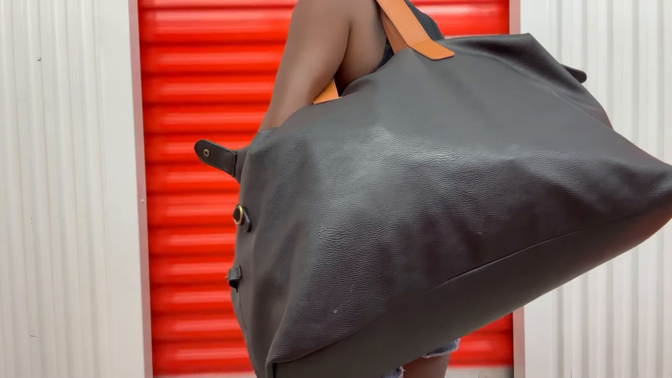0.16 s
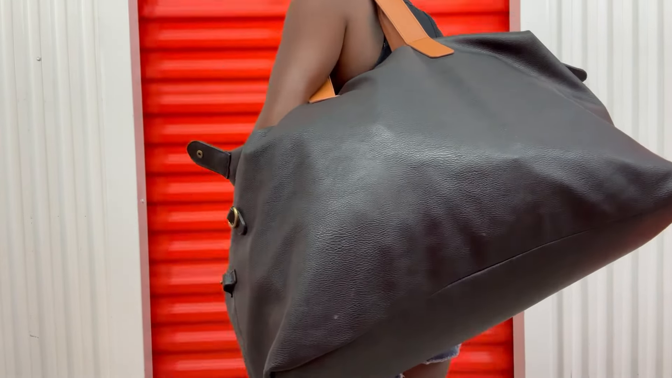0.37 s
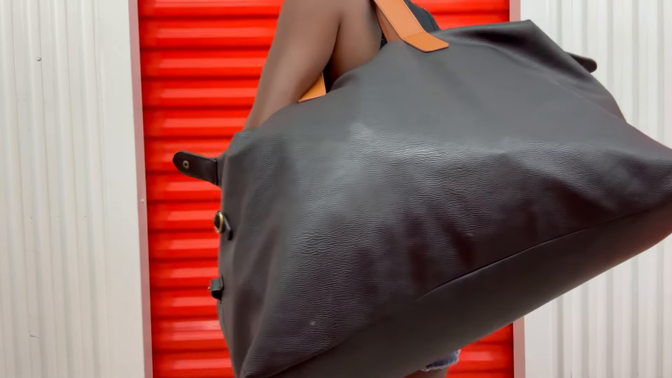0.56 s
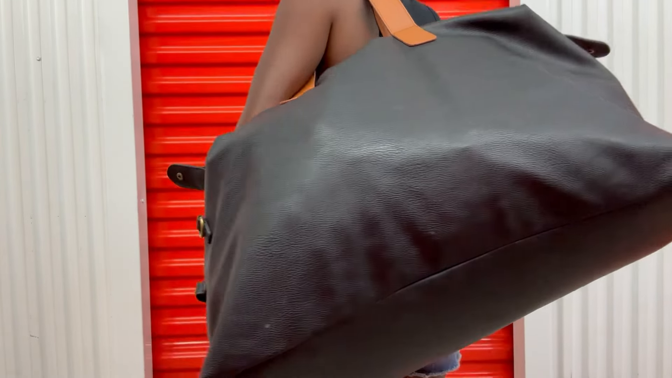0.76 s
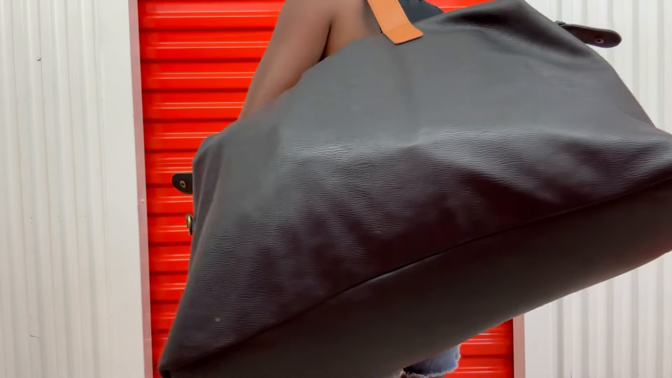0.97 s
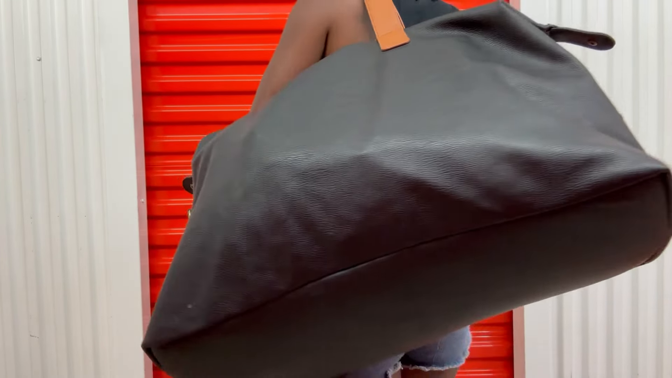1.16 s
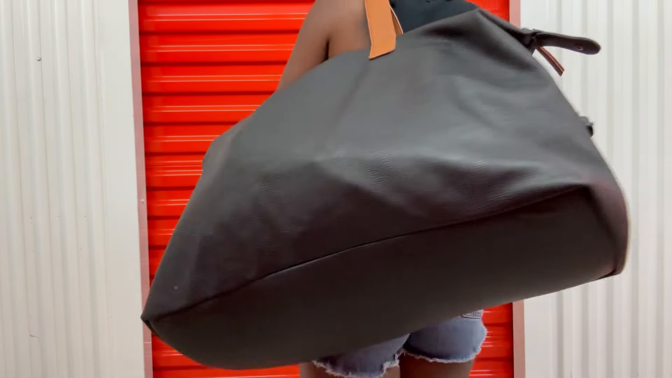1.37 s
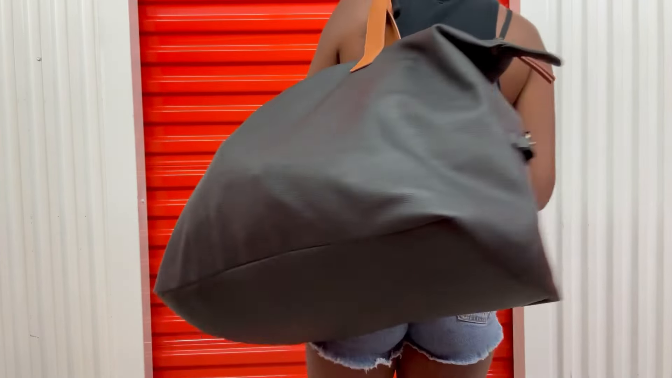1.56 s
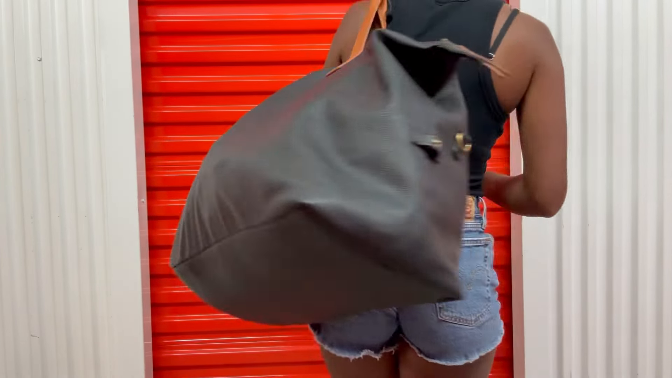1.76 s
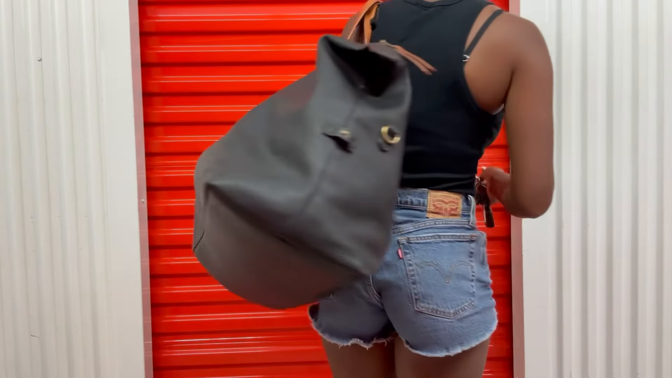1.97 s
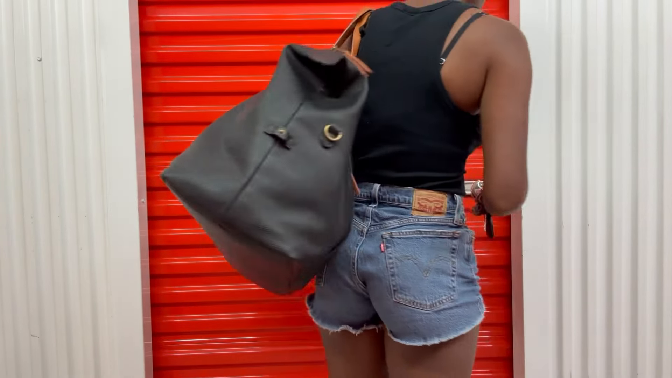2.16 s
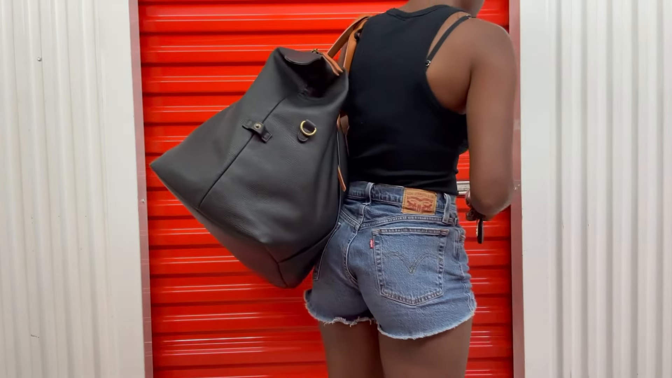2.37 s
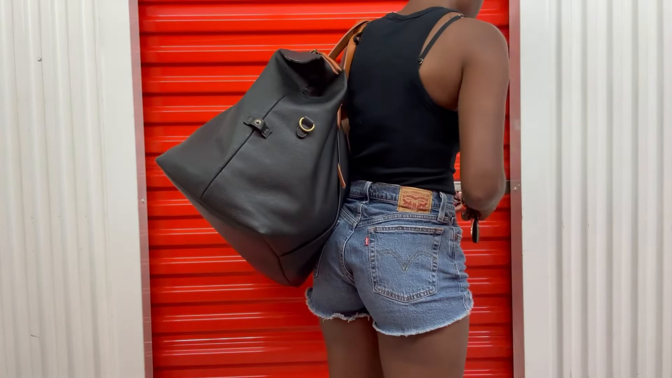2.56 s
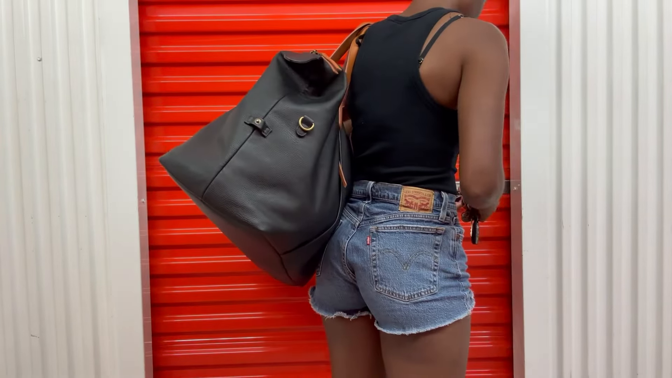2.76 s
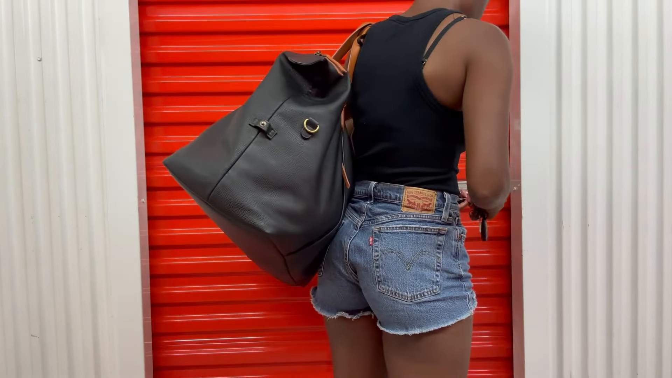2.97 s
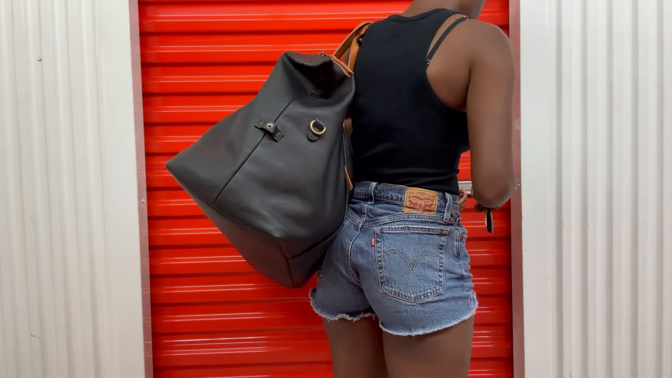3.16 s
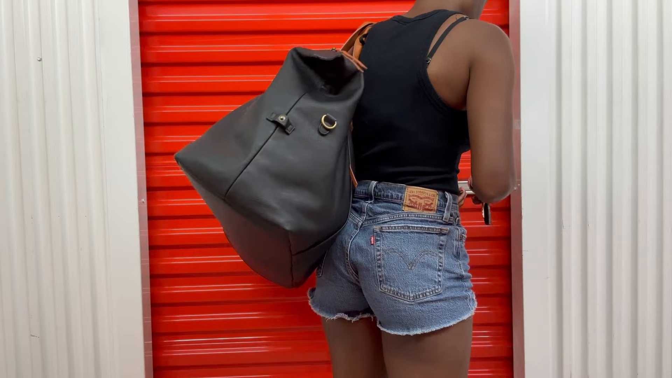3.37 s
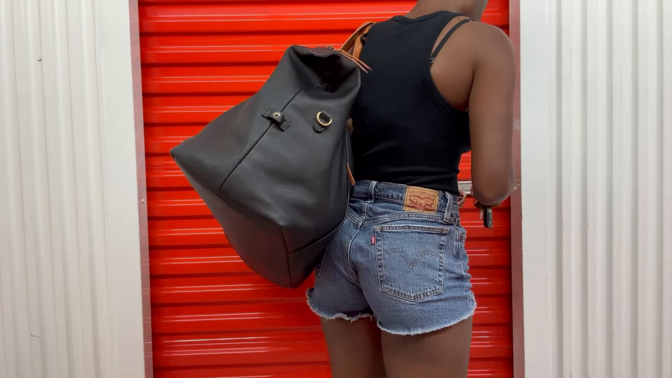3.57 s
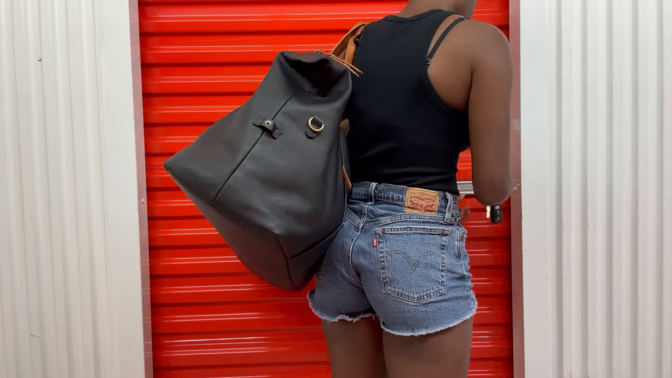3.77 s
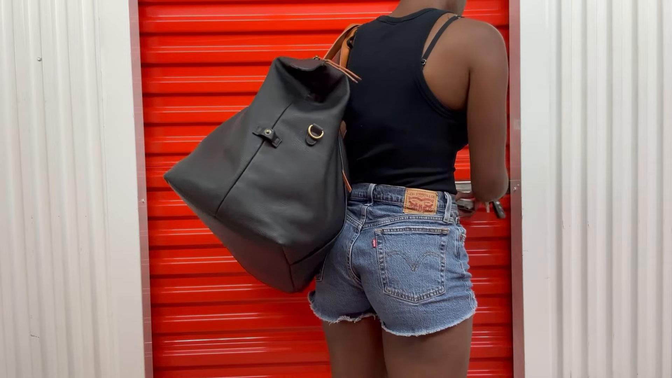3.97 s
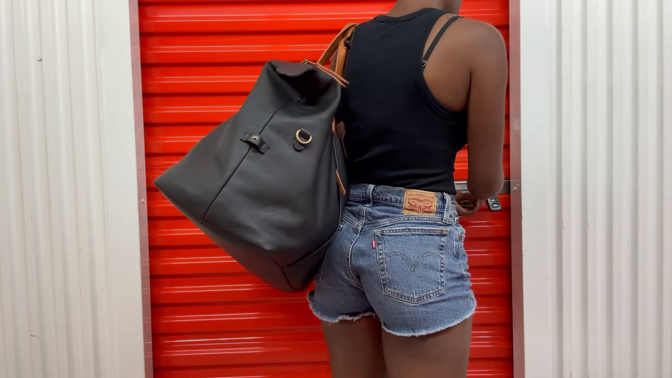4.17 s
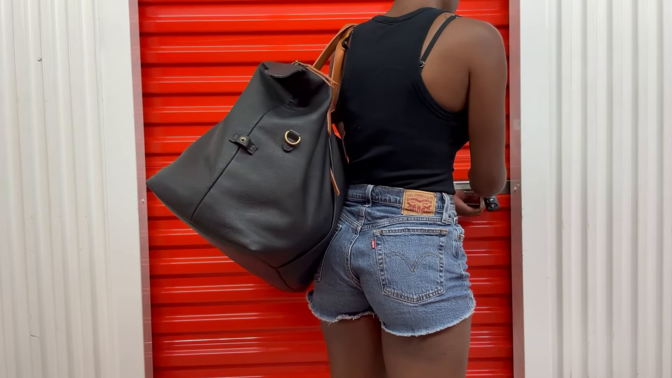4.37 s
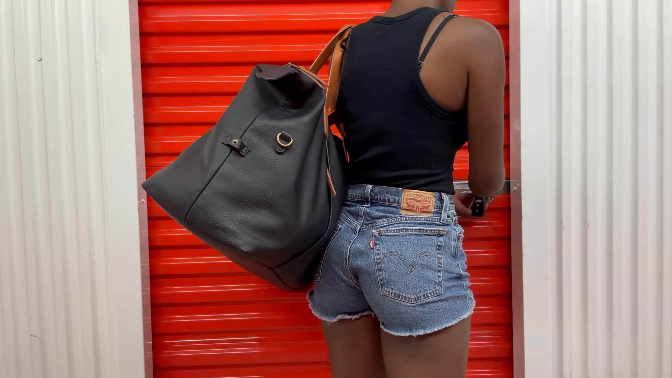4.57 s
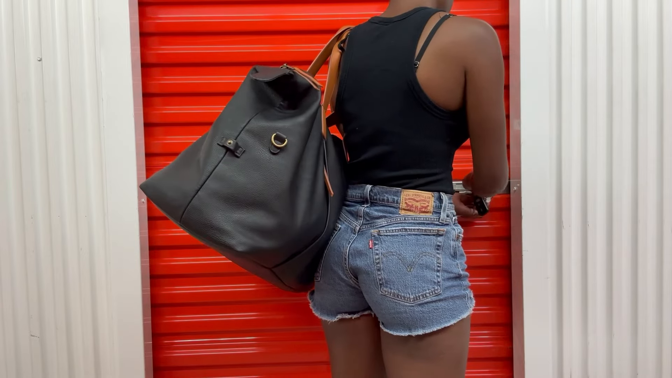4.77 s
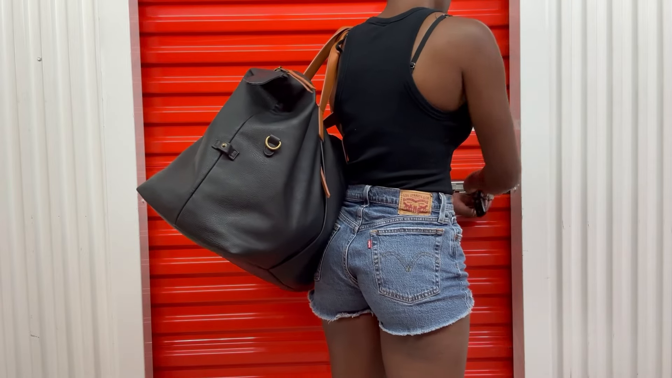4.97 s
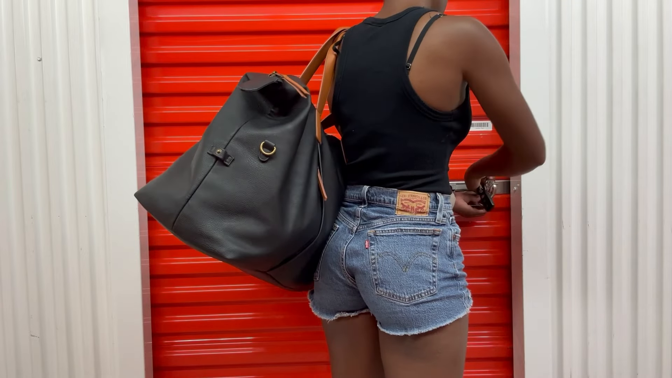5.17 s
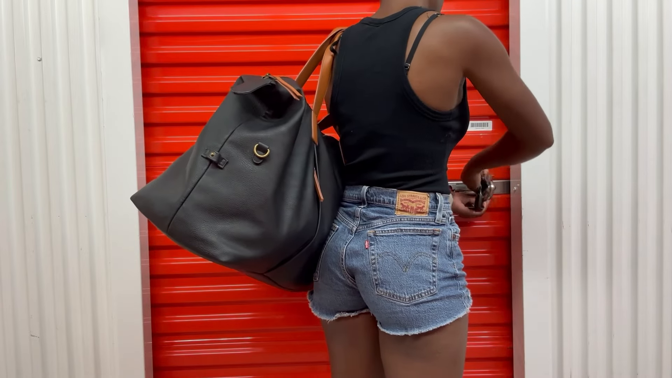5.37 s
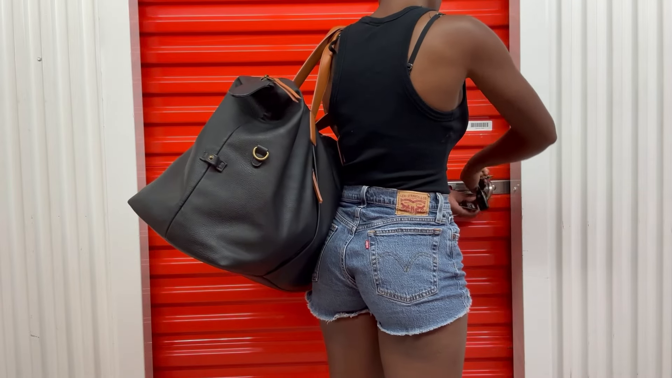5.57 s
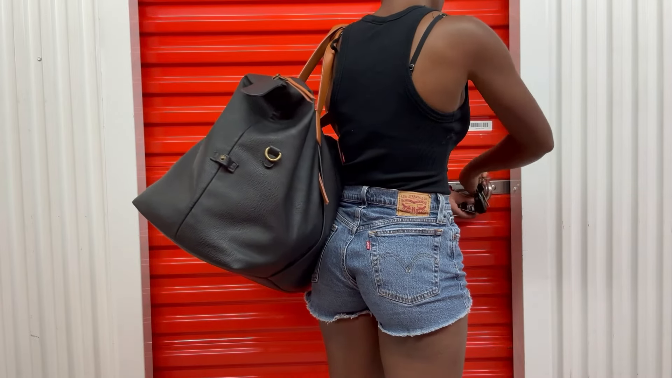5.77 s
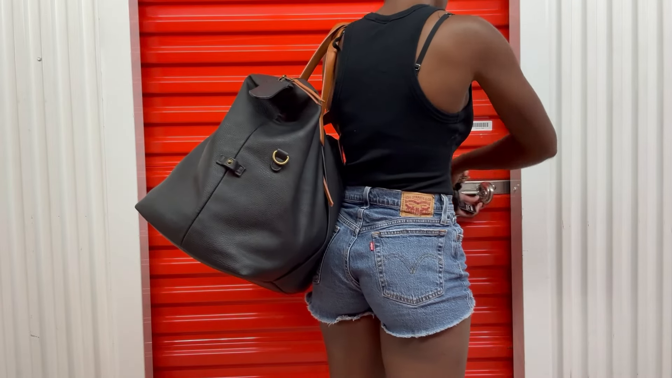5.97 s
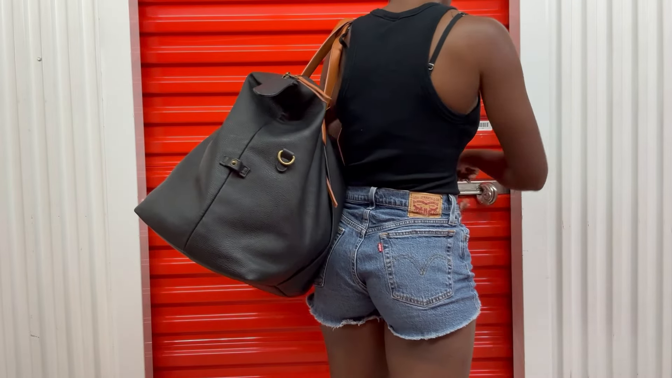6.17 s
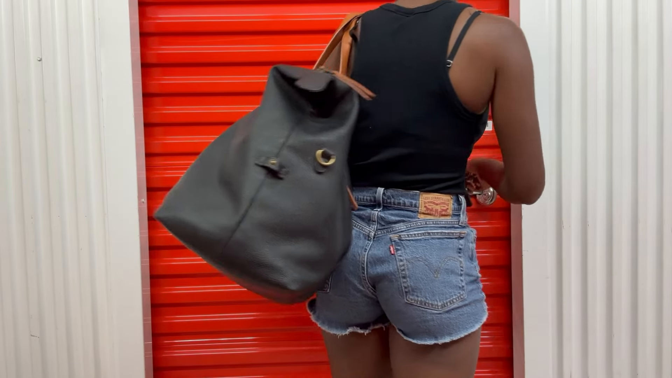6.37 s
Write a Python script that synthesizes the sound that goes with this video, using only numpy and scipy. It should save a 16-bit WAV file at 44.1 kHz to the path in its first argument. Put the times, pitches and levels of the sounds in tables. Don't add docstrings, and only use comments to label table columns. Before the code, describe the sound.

A corrugated metal roll-up door rattles loudly down and settles, then a latch and padlock clank and click in an echoing corridor over low ventilation rumble.

```python
import sys
import numpy as np
from scipy import signal
from scipy.io import wavfile
from scipy.ndimage import uniform_filter1d

SR = 44100
rng = np.random.default_rng(int(sys.argv[2]) if len(sys.argv) > 2 else 0)


def ratio(d):
    e = np.asarray(d, float) / 20
    return 10 ** e


def unload_wav(signal):
    wavfile.write(
        sys.argv[1],
        SR,
        np.round(np.clip(np.atleast_2d(signal).T, -1, 1) * 32767).astype(np.int16),
    )


N = 286650

# time in seconds, level in dB.
ROLL = [(0.0, -24), (.12, -20), (.45, -19.5), (.68, -21.5), (.73, -28), (.88, -20), (1.05, -31),
        (1.43, -57), (1.6, -63)]


def curtain():
    # frequency in Hz, level in dB per Hz.
    roll_color = [(20, -49.5), (34, -16), (60, 0), (101, -2.5), (199, -5), (341, -6), (496, -9.5),
                  (612, -8), (1120, -7.5), (1790, -14), (2320, -20.5), (2900, -24), (8000, -28),
                  (16000, -31)]
    roll_parts_hz = [150, 700, 3000]
    before = SR // 4
    running = round(ROLL[-1][0] * SR)
    clumps = ratio(4 * drift(45))[:before + running]
    slaps = contacts(per_s=300, spread_db=4, size=(4, before + running))
    rattle = evened(sheet(slaps * clumps, ring_db=-4.5), size=2600)
    echoes = corridor(roll_color, roll_parts_hz, direct_db=9.5, early_db=5, early_s=.035, build_s=.0029, count=4)
    out = np.zeros((2, N))
    for db, echo in zip(roll_levels(lead_s=.017), echoes):
        strength = ratio(np.pad(db[:running], (before, 0), "edge")) / 2
        sound = heard(strength * rattle, echo)[:, before:]
        out[:, :sound.shape[1]] += sound
    return out


def roll_levels(lead_s):
    # offset in dB, how strongly it follows the speed (ratio).
    roll_parts = [(0, 0.79), (0.7, 1.014), (-3.5, 1.14)]
    # time in seconds, swell in dB, brightness in dB.
    jolts = [(0., 4, -2), (0.063, 6, -2), (.11, 5, 2), (.186, 5, -3), (.23, 5, 1), (.3, 3, 3),
             (.414, 4.5, -1.5), (.5, 1, 1), (0.577, 2.5, -1.5), (0.671, 3.5, -2), (.796, 4.5, -1),
             (.876, 1, -0.5), (.96, -3, 2.2), (1.097, 4.5, 1.5), (1.2, 3, -3.8)]
    jolt_half_s = .036
    usual_db = ROLL[1][1]
    speed_db, = in_time(ROLL, lead_s)
    jerk_db, tilt_db = sum(np.outer(row, swell(s, jolt_half_s, lead_s)) for s, *row in jolts)
    levels = []
    for side, (db, follows) in zip([-1, 0, 1], roll_parts):
        levels.append(usual_db + db + follows * (speed_db - usual_db) + jerk_db + side * tilt_db)
    return levels


def latch():
    # frequency in Hz, level in dB per Hz.
    latch_color = [(88, -33), (150, -14), (322, -19), (497, -13), (649, -12), (951, -8.5), (1300, -15.5),
                   (2300, -23.5), (4000, -15.5), (8000, -23.5), (16000, -28.5)]
    latch_parts_hz = [700, 2200, 5500]
    ping_forces, close = pings()
    rub = contacts(per_s=350, spread_db=4.5, size=(3, N))
    forces = []
    for part, gain in zip(knocks() + ping_forces, rub_gains(lead_s=.016)):
        forces.append(part[:, :N] + ratio(-8.5) * gain * rub)
    forces[0] = sheet(forces[0], ring_db=-6.5)
    echoes = corridor(latch_color, latch_parts_hz, direct_db=7, early_db=1, early_s=.17, build_s=.0024, count=3)
    return close[:N] + sum(heard(force, echo)[:, :N] for force, echo in zip(forces, echoes))


def knocks():
    chatter_s = .0092
    t = np.arange(SR // 10) / SR
    forces = np.zeros((3, 3, N + len(t)))
    for k, (s, db, weight_db, bright_db) in enumerate(all_knocks()):
        chatter = rng.standard_normal(len(t)) ** 3 * np.exp(-t / chatter_s)
        blow = chatter / np.sqrt(np.sum(chatter ** 2)) + ratio(-.5) * (t == 0)
        part_db = db + np.array([weight_db + 24, 25, bright_db + 25])
        start = round((s - .003) * SR)
        forces[:, k % 3, start:start + len(t)] += ratio(part_db)[:, None] * blow
    return forces


def all_knocks():
    # time in seconds, strength in dB, weight on the sheet in dB, brightness in dB.
    latch_knocks = [(1.79, -64, -4, 6.5), (2.015, -32.5, -8.5, -3), (2.189, -38.5, -5.5, -3.5),
                    (2.339, -34, -17, -4), (2.385, -33, -4, -11.5), (2.449, -29, -5, 1),
                    (2.499, -34.5, 6, 2), (2.524, -26.5, -2, 0), (2.609, -65, 2, 18), (2.665, -40, 8, 5),
                    (2.989, -36.5, 3, 3.5), (3.019, -44, 12, 2), (3.313, -54.5, 1, -29),
                    (3.359, -66, 14, -13), (3.432, -51, 7, -15), (3.444, -53, 8, -9.5),
                    (3.556, -50.5, 5, -6), (3.633, -52, 4.5, -1.5), (3.675, -56.5, 10.5, -8),
                    (3.886, -42, 0, -6), (3.969, -57, 5, 2)]
    # time in seconds, strength in dB, weight on the sheet in dB, brightness in dB.
    lock_knocks = [(4.190, -38, 3, -18), (4.389, -38.5, 2, -19), (4.447, -34, -25, -4),
                   (4.499, -38.5, -18.5, -15.5), (4.619, -72, -1, -3.5), (4.712, -32.5, 1, -4.5),
                   (4.889, -54, 14.5, -9.5), (5.019, -57.5, 11, 8.5), (5.049, -33.5, 0, 1),
                   (5.123, -35, 0.5, -11.5), (5.157, -28, 1.5, -2), (5.306, -43, -21, -9.5),
                   (5.348, -27.5, -5, -7.5), (5.383, -26.5, -1, 1), (5.583, -26.5, -2.5, -5),
                   (5.619, -34.5, 6, -13), (5.671, -54.5, 21, 13), (5.707, -36.5, 4.5, -16.5),
                   (5.771, -46, 9, -14), (5.815, -35.5, 2.5, -7.5), (5.847, -37.5, 2, -4.5),
                   (5.879, -47.5, 10, -4), (5.916, -38, 9.5, -9.5), (5.943, -42.5, 6, -15.5),
                   (6.096, -38.5, 1.5, -7.5), (6.196, -46.5, -5, -5), (6.312, -54, -14, 7),
                   (6.418, -72.5, 5, 14.5)]
    shackle_s, step_s = 4.207, .028
    strongest_db, swell_db, weight_db, bright_db = -39, 2.5, 1.5, -17
    steps = []
    for k in range(5):
        db = strongest_db - swell_db * abs(k - 2.6)
        steps.append((shackle_s + step_s * k, db, weight_db, bright_db))
    return sorted(latch_knocks + steps + lock_knocks)


def pings():
    # time in seconds, frequency in Hz, level in dB, width in Hz (wider fades faster).
    ping_rows = [(1.822, 3506, -38, 200), (3.67, 1400, -50, 90), (2.02, 900, -26, 250),
                 (4.193, 950, -28, 200), (4.27, 1450, -28, 250), (4.39, 1600, -32, 250),
                 (5.165, 1300, -24, 300), (5.92, 1350, -30, 300), (2.017, 4090, -28, 200),
                 (5.917, 4800, -38, 120), (2.386, 2410, -35, 101), (2.61, 1880, -40, 90),
                 (3.952, 5900, -47, 80), (3.9, 2250, -38, 250), (4.713, 2240, -24.5, 220),
                 (5.049, 7200, -22, 200), (2.667, 2230, -33.5, 200), (5.158, 4780, -28, 120),
                 (5.349, 3420, -15.5, 300), (5.6, 2700, -37, 91), (6.1, 3660, -30, 140)]
    close_db = -12
    t = np.arange(SR // 10) / SR
    forces = np.zeros((3, 3, N + len(t)))
    close = np.zeros(N + len(t))
    for k, (s, hz, db, width_hz) in enumerate(ping_rows):
        t60_s = 2.2 / width_hz
        ping = ratio(db - 60 * t / t60_s) * np.sin(2 * np.pi * hz * t)
        start = round(s * SR)
        part = 2 if hz > 3500 else 1
        forces[part, k % 3, start:start + len(t)] += ping
        close[start:start + len(t)] += ratio(close_db) * ping
    return forces, close


def rub_gains(lead_s):
    # start in seconds, hold in seconds, strength in dB, brightness in dB.
    rubs = [(1.77, .15, -65, 13), (2.167, .03, -45, -0.5), (2.392, .12, -41.5, 1.5),
            (2.605, .15, -49.5, -3.5), (3.08, .05, -55, -6), (3.5, .12, -59.5, -0.7), (4.255, .06, -47, -4),
            (4.366, 0.1, -44, -6.5), (4.501, 0.14, -47, 0), (4.776, .08, -55.5, -5.5),
            (5.2, 0.057, -49.5, -4.5), (5.397, .05, -46, -6), (5.554, .42, -49.5, -2),
            (6.05, 0.12, -62.5, 2), (6.3, 0.23, -74.5, 1)]
    rise_db_per_s, fall_db_per_s = 246, 200
    block = 50
    t = np.arange(0, N, block) / SR + lead_s
    gains = 0
    for s, hold_s, db, bright_db in rubs:
        rise_db = -rise_db_per_s * np.maximum(s - t, 0)
        fall_db = -fall_db_per_s * np.maximum(t - s - hold_s, 0)
        part_db = db + np.array([1 - bright_db, 0, -5 + bright_db])
        gains = gains + np.outer(ratio(part_db), ratio(rise_db + fall_db))
    return np.repeat(gains, block, axis=1)


def keys():
    # time in seconds, peak in dB.
    ticks = [(2.6628, -29), (2.9467, -54), (4.6234, -46), (4.6604, -51), (4.6972, -36), (5.018, -41),
             (5.3043, -42), (6.1978, -45), (6.3121, -41), (6.4278, -46)]
    t60_s, low_hz, level_db = .012, 3500, -3
    t = np.arange(SR // 20) / SR
    out = np.zeros((2, N + len(t)))
    for s, db in ticks:
        snap = rng.standard_normal((2, len(t)))
        start = round(s * SR)
        out[:, start:start + len(t)] += ratio(db + level_db - 60 * t / t60_s) * snap
    return signal.sosfilt(signal.butter(2, low_hz, "high", fs=SR, output="sos"), out[:, :N])


def ventilation():
    # frequency in Hz, level in dB per Hz.
    air_color = [(15, -70), (25, -52), (52, -8), (74, -4.5), (101, -7.5), (135, -13), (157, -23),
                 (260, -32), (401, -35.5), (800, -45), (1250, -62), (2170, -52.5), (8000, -61),
                 (16000, -66)]
    # time in seconds, level in dB.
    air_bed = [(1.5, -54.5), (1.82, -54), (2.46, -49.5), (4.15, -50), (4.47, -50), (4.88, -47),
               (5.48, -45.5), (6.0, -47), (6.5, -48)]
    # time in seconds, swell in dB.
    gusts = [(1.551, 7), (1.82, 6.5), (2.15, 9), (2.71, 4), (3.12, 11.5), (3.74, 4.5), (4.11, 12.5),
             (4.33, 7), (4.42, 7), (5.19, 6), (5.3, 4), (5.56, 2), (5.98, 7), (6.3, 8)]
    gust_half_s, throb_spread_db = .058, 2.5
    air = sum(band * ratio(.8 * drift(9.1)) for hz, band in bands(air_color, size=N))
    tone = resonance(resonance(air, 71.7, width_hz=30), 71.7, width_hz=30)
    tone = evened(tone, size=3000)
    rest = air - resonance(air, 72, width_hz=45)
    bed_db, = in_time(air_bed)
    throb_db = throb_spread_db * drift(14) + sum(db * swell(s, gust_half_s) for s, db in gusts)
    return ratio(bed_db + throb_db + 6) * tone + ratio(bed_db + 6.5) * rms_one(rest)


def contacts(per_s, spread_db, size):
    sizes = ratio(spread_db * np.minimum(rng.exponential(1, size), 4)) * rng.choice([-1, 1], size)
    return rms_one(sizes * (rng.random(size) < per_s / SR))


def sheet(force, ring_db):
    sheet_hz = [117, 198, 425, 480, 508, 610, 793, 947, 1105, 1232, 1599, 2270, 2990, 4301, 6532]
    # width in Hz, level in dB over the sound color.
    sheet_rings = [(14, -2.5), (19.7, 4), (15, -17.5), (45, 7), (11.5, 16), (33, 6), (23, -10), (13, -6),
                   (30, 4.5), (17.25, -15.5), (16, 1), (120, 9.5), (80, 3.5), (47, 2), (60, 10.5)]
    out = force
    for hz, (width_hz, db) in zip(sheet_hz, sheet_rings):
        out = out + ratio(db + ring_db) * resonance(force, hz, width_hz)
    return out


def resonance(x, hz, width_hz):
    r = np.exp(-np.pi * width_hz / SR)
    top = np.array([1, 0, -1]) * (1 - r * r) / 2
    return signal.lfilter(top, [1, -2 * r * np.cos(2 * np.pi * hz / SR), r * r], x)


def corridor(spectrum, parts_hz, direct_db, early_db, early_s, build_s, count):
    # frequency in Hz, time to fade by 60 dB in seconds.
    corridor_t60 = [(60, 0.68), (260, 0.66), (700, 0.51), (1840, 0.56), (4850, 0.5), (12000, 0.26)]
    t = np.arange(SR * 3 // 5) / SR
    parts = np.zeros((len(parts_hz), 2, count, len(t)))
    for hz, band in bands(spectrum, size=count * len(t)):
        direct = ratio(direct_db - 60 * t / (.004 + 12 / hz))
        tail = ratio(-60 * t / at_hz(corridor_t60, hz)) + ratio(early_db - 60 * t / early_s)
        echo = band.reshape(2, count, -1) * (direct + tail * (1 - np.exp(-t / build_s)))
        for part, share in zip(parts, np.eye(len(parts_hz))):
            part += np.interp(np.log(hz), np.log(parts_hz), share) ** 2 * echo
    parts = parts / np.sqrt(np.sum(parts ** 2, axis=(1, 3), keepdims=True) / 2)
    return parts.transpose(0, 2, 1, 3)


def heard(forces, echoes):
    return signal.fftconvolve(forces[:, None], echoes, axes=2).sum(axis=0)


def bands(spectrum, size):
    # frequency in Hz, likeness (1 is the same).
    likeness = [(40, .997), (100, .994), (170, .9), (330, .72), (700, .2), (1400, .45), (3100, .05),
                (7000, .0)]
    white = rng.standard_normal((2, 2, size))
    limits_hz = 25 * 2 ** (np.arange(29) / 3)
    for k, (low, high) in enumerate(zip(limits_hz, limits_hz[1:])):
        band_filter = signal.butter(2, [low, high], "band", fs=SR, output="sos")
        mid, side = signal.sosfilt(band_filter, white[k % 2])
        hz = np.sqrt(low * high)
        alike = np.clip(at_hz(likeness, hz), -1, 1)
        stereo = np.sqrt(1 + alike) * mid + np.sqrt(1 - alike) * side * [[1], [-1]]
        yield hz, ratio(at_hz(spectrum, hz)) * stereo


def in_time(rows, lead_s=0.):
    s, *columns = np.transpose(rows)
    return [np.interp(np.arange(N) / SR + lead_s, s, c) for c in columns]


def at_hz(points, hz):
    points_hz, values = np.transpose(points)
    return np.interp(np.log(hz), np.log(points_hz), values)


def swell(s, half_s, lead_s=0.):
    return np.maximum(1 - np.abs(np.arange(N) / SR + lead_s - s) / max(half_s, .005), 0)


def drift(rate):
    count = int(N / SR * 60) + 3
    return np.interp(np.arange(N) / SR * rate, np.arange(count), rng.standard_normal(count))


def rms_one(x):
    return x / np.sqrt(np.mean(x ** 2) + 1e-20)


def evened(x, size):
    return x / np.sqrt(uniform_filter1d(np.mean(x ** 2, axis=0), size=size) + 1e-20)


def lose_bands(x):
    # 0 mid or 1 side, low edge in Hz, high edge in Hz, edge wander in Hz, share of frames.
    lost_bands = [(0, 8600, 10150, 300, 1), (0, 13750, 15200, 200, 1), (0, 15200, 16500, 100, .64),
                  (0, 15950, 18000, 0, 1), (1, 11100, 12900, 200, 1), (1, 6900, 7600, 150, .4),
                  (1, 15200, 16500, 100, .4), (1, 16100, 18000, 0, 1)]
    frame = dict(fs=SR, window="cosine", nperseg=2048, noverlap=1024)
    hz, s, spectra = signal.stft([x[0] + x[1], x[0] - x[1]], **frame)
    treble = np.abs(spectra[0, hz > 10000]).sum(axis=0)
    loud = np.argsort(np.argsort(treble)) / len(s)
    for channel, low_hz, high_hz, wander_hz, share in lost_bands:
        draws = rng.random((3, len(s) // 2 + 1))
        low, high, chance = np.repeat(draws, 2, axis=1)[:, :len(s)]
        above = hz[:, None] > low_hz + wander_hz * (2 * low - 1)
        below = hz[:, None] < high_hz + wander_hz * (2 * high - 1)
        spectra[int(channel)] *= ~(above & below & (.3 * chance + .7 * loud < share))
    mid, side = signal.istft(spectra, **frame)[1][:, :N]
    kept = np.array([mid + side, mid - side]) / 2
    return kept + spared(x) * (x - kept)


def spared(x):
    rise_db, spared_s = 12, .005
    power = np.sum(np.diff(x, 2, prepend=np.zeros((2, 2))) ** 2, axis=0)
    now = uniform_filter1d(power, size=100)
    before = np.roll(uniform_filter1d(power, size=600), 400)
    sharp = 1. * (now > before * ratio(2 * rise_db))
    sharp = uniform_filter1d(sharp, size=round(spared_s * SR)) > 0
    return uniform_filter1d(1. * sharp, size=60)


def scene():
    balance_db = np.array([[.2], [-.2]])
    return (curtain() + latch() + keys() + ventilation()) * ratio(balance_db)


def low_pass(x):
    return signal.sosfilt(signal.butter(12, 15940, fs=SR, output="sos"), x)


def record(dry):
    dry = signal.sosfilt(signal.butter(4, 41, "high", fs=SR, output="sos"), dry)
    limited = 1.36 * np.tanh(dry / 1.307)
    return low_pass(lose_bands(limited))


dry = scene()
out = record(dry)
unload_wav(out)
```